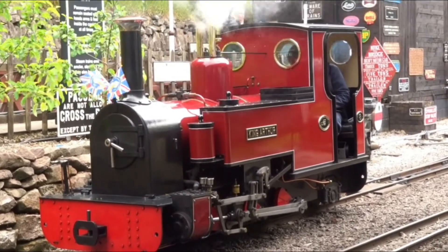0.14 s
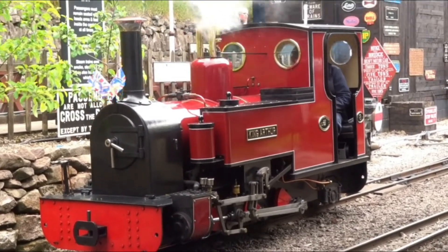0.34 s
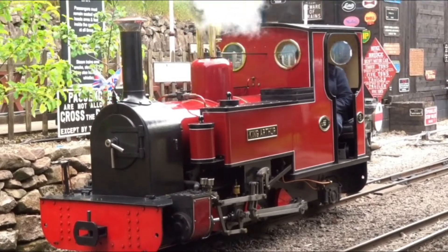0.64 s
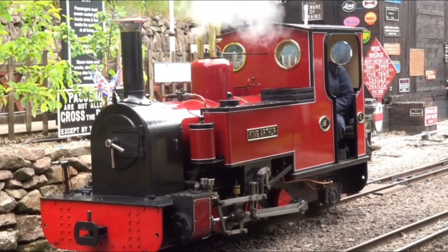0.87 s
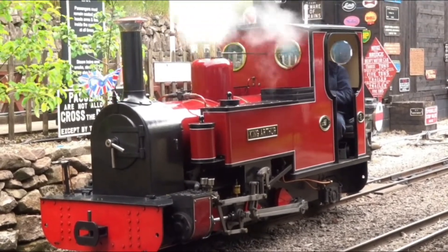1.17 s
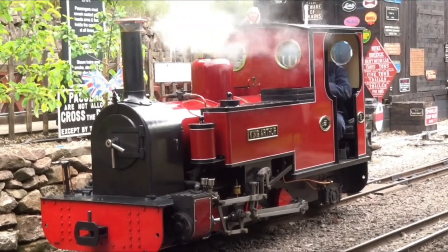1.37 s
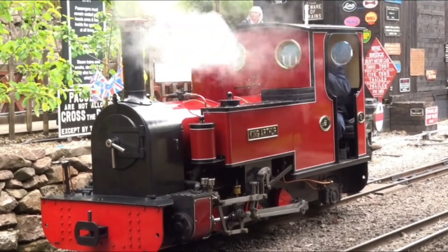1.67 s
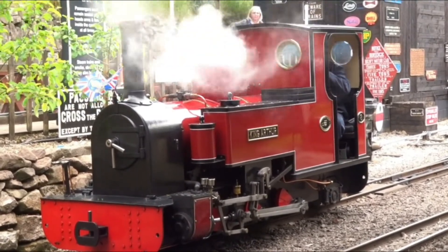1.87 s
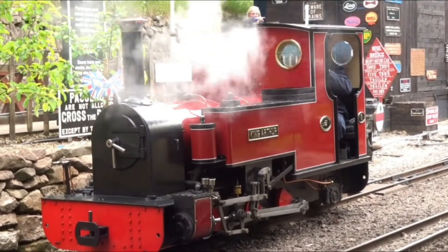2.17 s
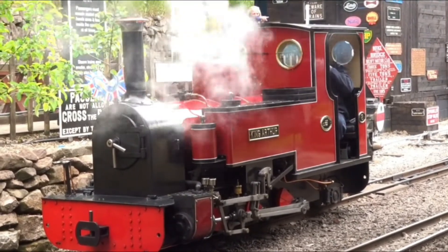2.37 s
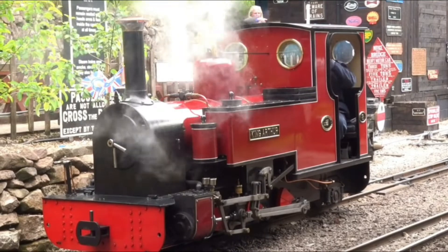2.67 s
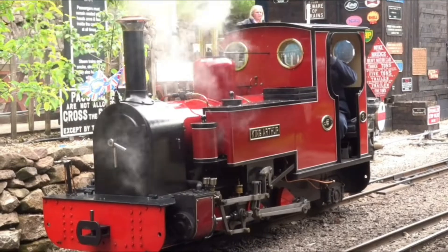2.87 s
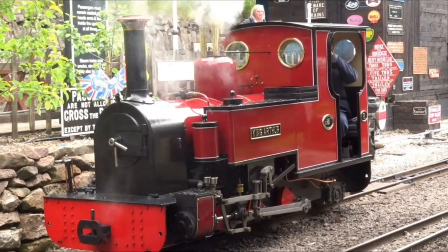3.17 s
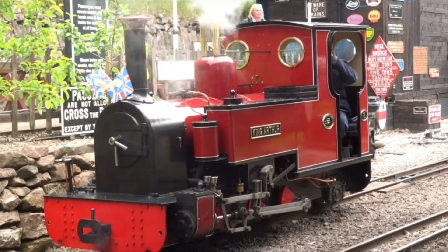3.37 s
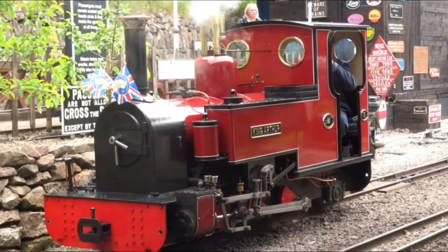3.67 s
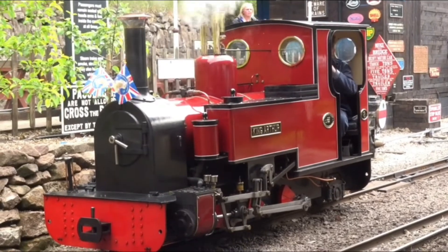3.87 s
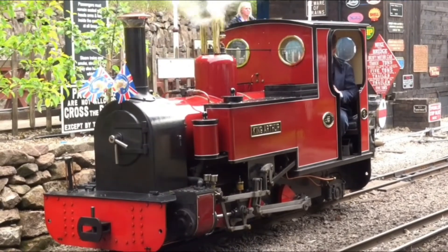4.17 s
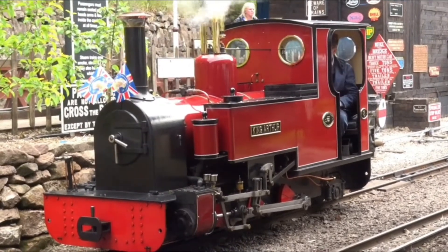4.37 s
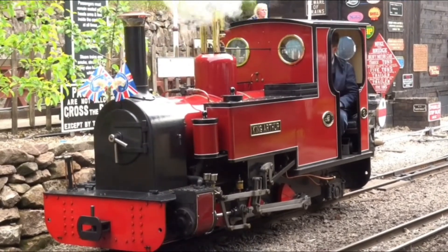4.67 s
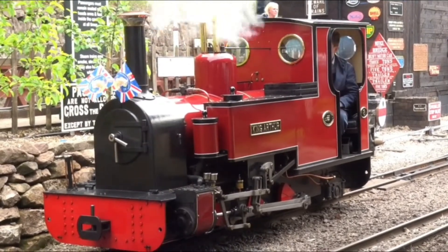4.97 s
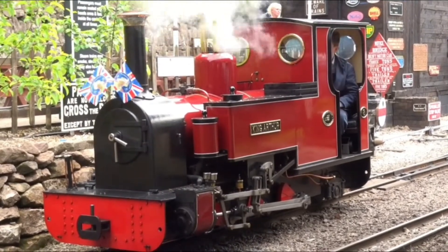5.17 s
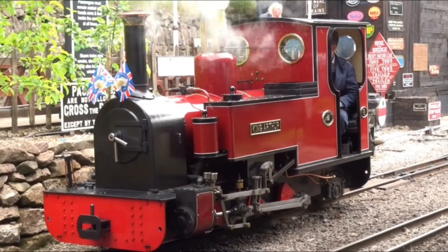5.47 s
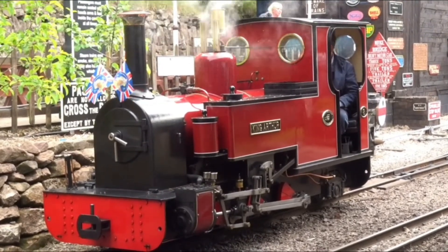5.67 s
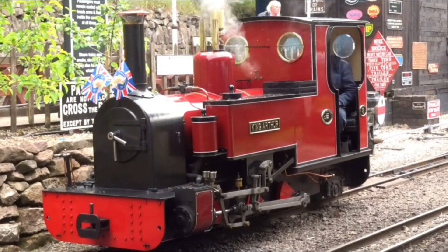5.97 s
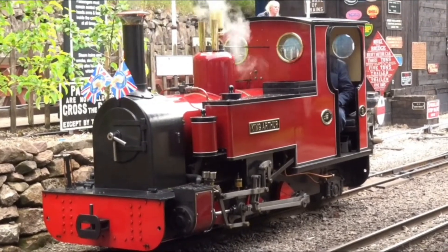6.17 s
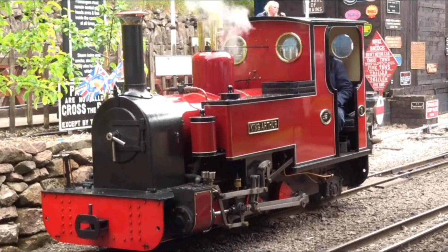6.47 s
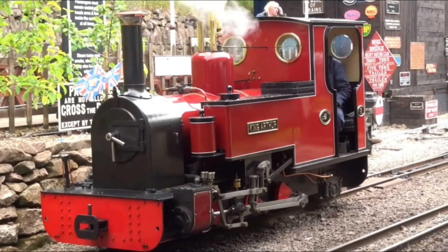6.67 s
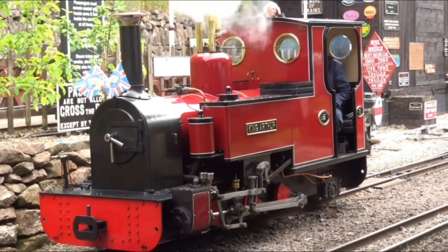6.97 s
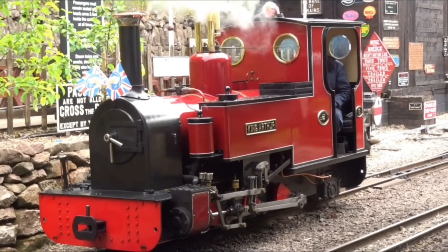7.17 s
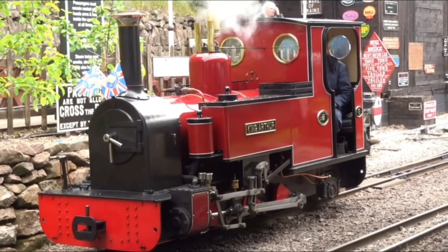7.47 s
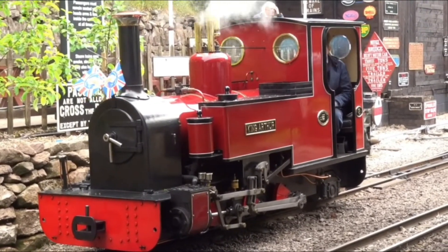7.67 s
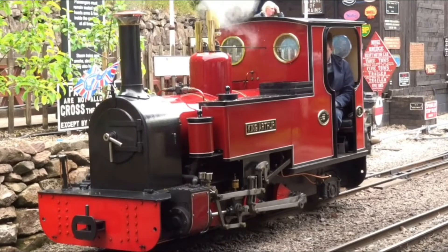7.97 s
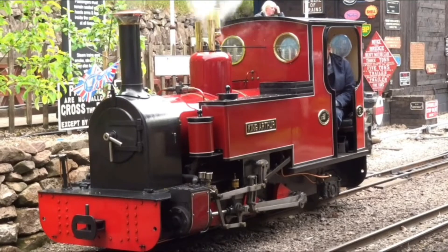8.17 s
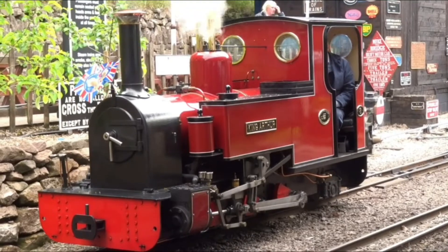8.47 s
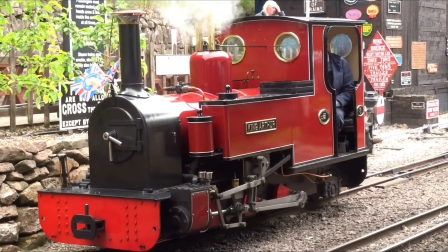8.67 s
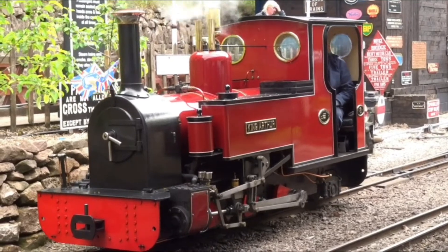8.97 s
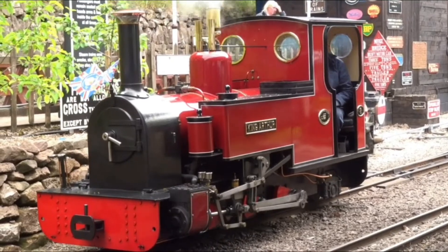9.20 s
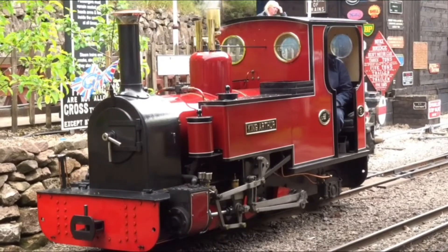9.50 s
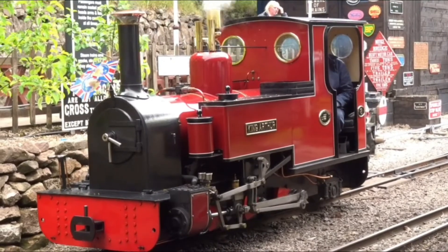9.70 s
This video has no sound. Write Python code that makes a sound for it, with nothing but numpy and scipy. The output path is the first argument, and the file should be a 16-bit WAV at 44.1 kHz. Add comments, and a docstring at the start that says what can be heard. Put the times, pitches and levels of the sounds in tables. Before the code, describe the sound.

From the start a standing steam engine's safety valve releases a loud, dense, bright hiss, with little bass and a wide treble, coloured by hollow, singing resonances around the middle and upper range. Between about 0.5 and 1.3 seconds thin, wavering squeals catch and break off inside it. The jet eases slightly, then holds with small flutters and brief whistly flare-ups near 2.5, 3 and 3.7 seconds. A dull fire roar and soft low puffs lie almost buried underneath. At about 5.1 seconds a wet, gurgling steam rush builds, brightens, and becomes a short hoarse whistle toot from roughly 5.3 to 5.6, scooping up in pitch, with a short outdoor station echo. The automatic level then leaves the hiss clearly quieter; held briefly, it slowly swells back until the end near 10 seconds, with small shifts and a quick singing flare around 8.3.

```python
"""Steam locomotive with safety valve and whistle

A small engine stands at a station: shaped noise is the valve's jet, with singing cavities and squeals. Under it
lie a gusty low roar at the bottom edge of the hiss and faint low swells of narrow noise. One tug on the chime
whistle lets wet steam rush, then swept sines sound the bells. A gain control ducks under the toot, so the hiss
drops and slowly swells back."""
import sys
import numpy as np
from scipy import signal
from scipy.fft import rfft, irfft, next_fast_len
from scipy.io import wavfile
from scipy.ndimage import uniform_filter1d, minimum_filter1d, map_coordinates

SR = 44100
rng = np.random.default_rng(int(sys.argv[2]) if len(sys.argv) > 2 else 0)


def digitize_waveform(pressure):
    """Quantize a signal to 16-bit integers and store it at the path in sys.argv[1].

    Rows of a 2-D input are taken as channels; values are limited to [-1, 1].
    """
    field = np.atleast_2d(pressure).T
    bounded = np.clip(field, -1, 1)
    quanta = np.round(bounded * 32767).astype(np.int16)
    wavfile.write(sys.argv[1], SR, quanta)


N = 433944
TIME = np.arange(N) / SR
SIZE = next_fast_len(N + SR)
FREQS = np.maximum(np.fft.rfftfreq(SIZE, 1 / SR), 1)

# Jet's broad colour: (frequency [Hz], relative density [dB per Hz])
JET_COLOUR = [(380, -6), (820, -9), (1000, -5), (2000, -2.5), (2800, 0.5), (4000, -6), (5300, -3),
              (7500, -3), (10900, -3.5)]
# Resonances of valve bonnet and cab front: (frequency [Hz], width [Hz], gain [dB])
BONNET_RESONANCES = [(680, 193, 4), (870, 54, -0.5), (935, 69, 3.5), (1034, 79, 14), (1058, 27.6, -18),
                     (1103, 41, 7.5), (1228, 61, 5), (1440, 150, 3.5), (1611, 27, 10), (1702, 143, 7),
                     (1754, 29, 5.5), (1988, 16, 4), (2143, 130, 3.5), (2190, 140, 1.5), (2355, 270, 3.5),
                     (2512, 8, 4), (2615, 45, 7), (2730, 170, 3.5), (2980, 64, 5.5), (3172, 160, 7),
                     (3400, 64, 3), (3520, 70, 8), (3670, 29, 8.5), (3804, 230, 10.5), (3900, 35, 0),
                     (4130, 160, 8), (4330, 45, 9), (4730, 70, 3.5), (4870, 170, 7.5), (5120, 100, 4.5),
                     (5710, 210, 6), (6540, 200, 6), (7200, 120, 1), (7950, 290, 4), (9450, 200, 3.5),
                     (10520, 580, 3)]
# Notches where the ground bounce cancels the jet: (frequency [Hz], width [Hz], gain [dB])
GROUND_NOTCHES = [(5400, 100, -4), (7650, 230, -4.5), (9030, 200, -2.5)]
# Cavity notes the jet makes sing: (frequency [Hz], width [Hz], rms re jet before drive [dB])
CAVITY_NOTES = [(2405, 35, -20), (2468, 16, -17.5), (4160, 85, -18), (1083, 14, -22)]
# Cavity notes flaring up: (centre [s], Gaussian width [s], note [Hz], extra drive [dB])
CAVITY_FLARES = [(2.543, 0.094, 4160, 5), (2.976, 0.03, 4160, 10.5), (3.672, 0.036, 1083, 9.5),
                 (8.08, 0.05, 2468, 2), (8.3, 0.034, 1083, 15), (8.317, 0.037, 4160, 10)]
# Valve lifting further or sinking: (start [s], end [s], jet change [dB], sizzle change [dB])
VALVE_SHIFTS = [(0.0, 0.207, 1, 2), (0.68, 1.092, 1, 2.5), (1.1, 2.018, -1.04, -1.3), (2.3, 3.0, 0, -0.4),
                (3.01, 3.055, -1.5, -3), (4.803, 5.45, 0.0, 2), (5.75, 6.6, 0.26, 0),
                (7.123, 7.426, 0, -0.4), (7.48, 7.98, -1.16, 0.5), (8.15, 8.41, 0.55, 1),
                (8.616, 9.22, 0.54, 0), (9.275, 9.58, -1.0, 0.5)]
# Valve's left-right lean: (frequency [Hz], left minus right [dB])
VALVE_LEAN = [(400, 0.1), (1200, -1), (1880, -0.5), (2250, -2), (2700, -0.3), (3700, -1), (4600, 1),
              (5500, 0), (6200, 1), (7200, -0.5), (7850, -4.5), (8600, -1.5), (9800, -1), (10800, 0.5)]
# Echoes off boiler, ground, walls: (delay [ms], level before wall gain [dB], extra right delay [ms])
SURFACE_ECHOES = [(5.5, -23, .08), (6.26, -26, -.02), (6.4, -22, 0), (6.48, -26, .08), (7.12, -25, .02),
                  (11.1, -23, .1), (11.74, -25, -.16), (14.84, -26, .06), (15.66, -24, .04),
                  (20.18, -27, -.02), (22.0, -25, .06), (28.76, -25, .02)]
# Edge tones while the valve rides on its seat:
# (start [s], end [s], frequency [Hz], peak before flutter and pan [dB])
SEAT_SQUEALS = [(0.46, 0.567, 2415, -26), (0.584, 0.84, 2405, -22), (0.688, 0.74, 2450, -20),
                (0.75, 0.82, 2466, -21.5), (0.836, 0.9, 2460, -23), (0.86, 0.99, 2440, -28),
                (0.964, 1.09, 2444, -23.5), (1.163, 1.23, 2420, -25), (1.23, 1.32, 2420, -30)]
# Steam at the whistle mouth: (frequency [Hz], relative density [dB per Hz])
RUSH_COLOUR = [(300, -10), (500, -9), (700, -5), (930, 1), (1250, -2.5), (1700, -7.5), (2330, 0),
               (3100, -5.5), (3900, -3.5), (5400, -5), (7000, -8), (8100, -5.5), (9100, -5.5), (10500, -9)]
# Chime notes, overblown upper ones first to speak:
# (frequency [Hz], level re chime [dB], roughness [0-1], start [s], end [s], ring [s])
BELL_NOTES = [(480, -11.5, .55, 5.37, 5.565, .025), (614, -12.5, .7, 5.395, 5.53, .02),
              (792, 0, .22, 5.38, 5.56, .016), (965, -20, .7, 5.29, 5.38, .03),
              (1280, -19, .5, 5.28, 5.43, .05), (1586, -19, .45, 5.33, 5.53, .03)]
# Faint low swells of narrow noise, strongest during the whistle: (start [s], end [s], centre [Hz], level [dB])
LOW_SWELLS = [(1.066, 1.23, 287, -56), (1.995, 2.1, 290, -53.5), (3.25, 3.335, 285, -59),
              (5.058, 5.2, 310, -42), (5.16, 5.29, 330, -36), (5.477, 5.547, 312, -36.5),
              (8.14, 8.206, 295, -56), (8.568, 8.70, 182, -50), (8.715, 8.785, 174, -48),
              (9.725, 9.796, 257, -46)]
# Steam noise's stereo likeness: (frequency [Hz], left-right likeness [0-1])
STEREO_LIKENESS = [(400, 0.87), (1000, 0.89), (2000, 0.72), (4000, 0.63), (8000, 0.2), (11000, 0.14)]

ROAR_GROWTH_DB_PER_S = 1.05  # the low roar grows steadily louder
VALVE_DB, SHIFT_S = -20, 0.023
SIZZLE_START_DB, SIZZLE_FADE_DB_PER_S = 2, 0.17  # fades as boiler pressure falls
UPPER_FROM_S, UPPER_BEFORE_DB, UPPER_AFTER_DB = 1.63, -1.5, 4.5  # upper cavity's drive steps up
LOWER_DRIVE_DB, DEEP_DRIVE_DB = 1.5, -2
DRIVE_DB_PER_JET_DB = 1.8  # lower pair only
FLARE_REACH_HZ = 150  # notes this close flare together
PULL_S, CHIME_HISS_S, LET_GO_S = 5.062, 5.1, 5.56
RUSH_DB, RUSH_ATTACK_S, RUSH_RELEASE_S = -11, 0.11, 0.048
CHIME_HISS_DB, CHIME_HISS_ATTACK_S, CHIME_HISS_RELEASE_S = 1.5, 0.071, 0.025  # extra rush
CHIME_DB, BELL_ATTACK_S = -8.5, 0.05
YARD_T60_S, YARD_DB, YARD_THIN_HZ = 0.56, -13, 477  # little returns below this pitch
LOW_CUT_HZ, TOP_CUT_HZ = 381, 11010
GAIN_KNEE_DB, GAIN_SLOPE, GAIN_HOLD_S, GAIN_RECOVERY_S = -15, 0.96, 0.57, 2.09


def from_db(db):
    """Decibels to amplitude gain."""
    return 10 ** (np.asarray(db) / 20)


def rms_one(x):
    """Scale to unit rms."""
    return x / np.sqrt(np.mean(x ** 2) + 1e-20)


def over_hz(points):
    """Table joined by straight lines over log frequency."""
    hz, value = np.transpose(points)
    return np.interp(np.log(FREQS), np.log(hz), value)


def resonances_db(rows):
    """Summed bell-shaped peaks and dips over frequency."""
    return sum(db / (1 + (2 * (FREQS - hz) / width_hz) ** 2) for hz, width_hz, db in rows)


def filtered(x, response):
    """Pass a sound through a frequency response."""
    return irfft(rfft(x, SIZE) * response, SIZE)[..., :N]


def drift(corner_hz):
    """Smooth random wander, rms 1: two-pole lowpassed noise on every 40th sample."""
    step = 40
    pole = np.exp(-2 * np.pi * corner_hz * step / SR)
    white = rng.standard_normal(N // step + 2002)
    slow = signal.lfilter([1], [1, -2 * pole, pole * pole], white)[2000:]  # drop the run-in
    return np.interp(np.arange(N) / step, np.arange(len(slow)), rms_one(slow))


def envelope(start_s, end_s, attack_s, release_s):
    """Rise exponentially towards 1 from the start; die away after the end."""
    rise = 1 - np.exp(-np.maximum(TIME - start_s, 0) / attack_s)
    return rise * np.exp(-np.maximum(TIME - end_s, 0) / release_s)


def swell(start_s, end_s):
    """One half-sine hump."""
    return np.sin(np.pi * np.clip((TIME - start_s) / (end_s - start_s), 0, 1))


def steam_noise(response):
    """Stereo turbulence of a given colour, wider towards the treble; rms 1."""
    alike = np.clip(over_hz(STEREO_LIKENESS), 0, .99)
    mid = filtered(rng.standard_normal(N), response * np.sqrt(1 + alike))
    side = filtered(rng.standard_normal(N), response * np.sqrt(1 - alike))
    return rms_one(np.array([mid + side, mid - side]))


def low_roar(roar_start_db=-60.0, roar_hz=330, width_hz=32, gust_corner_hz=12):
    """Dull low roar at the bottom edge of the hiss: narrow noise in short random gusts."""
    roar = steam_noise(1 / (1 + ((FREQS - roar_hz) / width_hz) ** 8))
    gusts = np.tanh(np.maximum(drift(gust_corner_hz), 0) ** 2)
    return roar * gusts * from_db(roar_start_db + ROAR_GROWTH_DB_PER_S * TIME)


def low_swells(half_width_hz=26, order=4):
    """Short swells of dull, narrow noise, the same at both ears."""
    out, white = 0, rng.standard_normal(N)
    for start_s, end_s, hz, db in LOW_SWELLS:
        edges_hz = [hz - half_width_hz, hz + half_width_hz]
        band = signal.butter(order, edges_hz, "band", fs=SR, output="sos")
        puff = rms_one(signal.sosfilt(band, white))
        out = out + from_db(db) * swell(start_s, end_s) ** 2 * puff
    return out


def near_echoes(wall_db=2.0, wall_hz=3000, scatter_db=-10, scatter_hz=4200, fade_ms=12, count=30):
    """Large surfaces return the low hiss; small fittings scatter the treble, differently to each ear."""
    walls, fittings = np.zeros((2, 2, len(FREQS)), complex)
    for ms, db, late_ms in SURFACE_ECHOES:
        delay_s = np.array([[ms], [ms + late_ms]]) / 1000
        walls += from_db(wall_db + db) * np.exp(-2j * np.pi * FREQS * delay_s)
    for ear in range(2):
        delays_ms = rng.uniform(2, 40, count)
        at = (delays_ms * SR / 1000).astype(int)
        taps = np.zeros(SIZE)
        taps[at] = rng.choice([-1, 1], count) * np.exp(-delays_ms / fade_ms)
        fittings[ear] = from_db(scatter_db) * rfft(taps) / np.linalg.norm(taps)
    treble_power = 1 / (1 + (scatter_hz / FREQS) ** 6)
    dulled_walls = walls / np.sqrt(1 + (FREQS / wall_hz) ** 2)
    out = 1 + dulled_walls + np.sqrt(treble_power) * fittings
    return out / np.sqrt(np.mean(abs(out) ** 2))


def through_plume(x, paths_ms=(1.3, 2.9, 4.6), echo_db=-15, sway_ms=0.029, sway_corner_hz=0.61):
    """Glancing paths cross the swaying cloud; wandering delays keep shifting the treble colour."""
    out, at = x, np.arange(N)
    for ms in paths_ms:
        delay = (ms + sway_ms * drift(sway_corner_hz)) * SR / 1000  # samples
        echo = np.array([map_coordinates(side, [at - delay], order=3) for side in x])
        out = out + from_db(echo_db) * echo
    return out


def valve_flow():
    """Jet and sizzle levels in dB, as the valve shifts on its spring."""
    jet_db, sizzle_db = 0, SIZZLE_START_DB - SIZZLE_FADE_DB_PER_S * TIME
    for start_s, end_s, more_jet_db, more_sizzle_db in VALVE_SHIFTS:
        shifted = envelope(start_s, end_s, SHIFT_S, SHIFT_S)
        jet_db = jet_db + more_jet_db * shifted
        sizzle_db = sizzle_db + more_sizzle_db * shifted
    return jet_db, sizzle_db


def cavity_drives(jet_db, fitful_db=0.5, fit_corner_hz=6):
    """Drive of each cavity note in dB: all by fits, the lower pair also with the jet."""
    lower_db = LOWER_DRIVE_DB + DRIVE_DB_PER_JET_DB * jet_db + fitful_db * drift(fit_corner_hz)
    upper_step_db = np.where(TIME < UPPER_FROM_S, UPPER_BEFORE_DB, UPPER_AFTER_DB)
    upper_db = upper_step_db + fitful_db * drift(fit_corner_hz)
    deep_db = DEEP_DRIVE_DB + fitful_db * drift(fit_corner_hz)
    return lower_db, lower_db, upper_db, deep_db


def flare_db(hz):
    """Extra drive of one cavity note from its Gaussian flare-ups."""
    return sum(db * np.exp(-((TIME - centre_s) / width_s) ** 2)
               for centre_s, width_s, note_hz, db in CAVITY_FLARES if abs(note_hz - hz) < FLARE_REACH_HZ)


def safety_valve(flutter_db=0.76, sizzle_flutter_db=0.5, sizzle_hz=6000):
    """Turbulent jet coloured by the bonnet; cavities sing by fits, the finest eddies sizzle."""
    jet_db, sizzle_db = valve_flow()
    colour_db = over_hz(JET_COLOUR) + resonances_db(BONNET_RESONANCES) + resonances_db(GROUND_NOTCHES)
    jet = steam_noise(from_db(colour_db))
    sizzle = filtered(jet, 1 / (1 + (sizzle_hz / FREQS) ** 6))
    sizzle_gain = from_db(sizzle_db + sizzle_flutter_db * drift(23))
    out = jet - sizzle + through_plume(sizzle) * sizzle_gain
    for (hz, width_hz, db), drive_db in zip(CAVITY_NOTES, cavity_drives(jet_db)):
        note = steam_noise(1 / (1 + ((FREQS - hz) / width_hz) ** 2))
        out += note * from_db(db + drive_db + flare_db(hz))
    level_db = VALVE_DB + jet_db + flutter_db * drift(21.6)
    lean = from_db(over_hz(VALVE_LEAN) * [[.5], [-.5]])
    return filtered(out * from_db(level_db), near_echoes() * lean)


def squeal(waver=0.0018, flutter_db=1.5):
    """Wavering edge tones catch and break off at close pitches, at times overlapping."""
    out = 0
    for start_s, end_s, hz, db in SEAT_SQUEALS:
        phase = 2 * np.pi * np.cumsum(hz * (1 + waver * drift(29))) / SR
        out = out + np.sin(phase) * swell(start_s, end_s) * from_db(db)
    return out * from_db(flutter_db * drift(31))


def yard(x):
    """Reverberation between station walls: eight dying echo trains a side."""
    out = np.zeros((2, len(FREQS)), complex)
    for k, delay_s in enumerate(rng.uniform(.025, .085, 16)):
        loop = from_db(-60 * delay_s / YARD_T60_S) * np.exp(-2j * np.pi * FREQS * delay_s)
        out[k % 2] += (-1) ** (k // 2) * loop / (1 - loop)
    level = out / np.sqrt(np.mean(abs(out) ** 2))
    return filtered(x, level / (1 + (YARD_THIN_HZ / FREQS) ** 4))


def far_wall(x, delay_s=0.12, db=-17.0, dull_hz=1500):
    """One dull slap from the station building."""
    slap = from_db(db) * np.exp(-2j * np.pi * FREQS * delay_s)
    return filtered(x, slap / (1 + (FREQS / dull_hz) ** 2))


def bells(pitch_waver=0.0294, flutter_db=5, scoop=.17, settle_s=0.0188):
    """Notes catch flat, scoop up and die at their own pace; water shakes pitch and level."""
    out = 0
    for hz, db, rough, start_s, end_s, ring_s in BELL_NOTES:
        pitch_hz = hz * (1 - scoop * np.exp(-np.maximum(TIME - start_s, 0) / settle_s))
        phase = 2 * np.pi * np.cumsum(pitch_hz * (1 + rough * pitch_waver * drift(61))) / SR
        level = from_db(db + rough * flutter_db * drift(60))
        shape = envelope(start_s, end_s, BELL_ATTACK_S, ring_s)
        out = out + np.sqrt(2) * np.sin(phase) * shape * level
    return out


def whistle(splutter_db=0.2, gurgle_db=2.5, gurgle_hz=1300, dry_hz=8000, dry_db=4, dry_s=5.24,
            dry_rise_s=0.046):
    """Wet steam gurgles through the mouth, hisses brighter as it dries, then sounds the bells."""
    flow = envelope(PULL_S, LET_GO_S, RUSH_ATTACK_S, RUSH_RELEASE_S)
    chime_hiss = envelope(CHIME_HISS_S, LET_GO_S, CHIME_HISS_ATTACK_S, CHIME_HISS_RELEASE_S)
    steam = steam_noise(from_db(over_hz(RUSH_COLOUR) + resonances_db(GROUND_NOTCHES)))
    body = filtered(steam, 1 / (1 + (FREQS / gurgle_hz) ** 4))
    top = filtered(steam, 1 / (1 + (dry_hz / FREQS) ** 12))
    dryness = np.tanh((TIME - dry_s) / dry_rise_s)  # -1 wet, +1 dry
    gurgle = body * from_db(gurgle_db * drift(30))
    rush = steam - body - top + gurgle + top * from_db(dry_db * dryness)
    rush_db = RUSH_DB + CHIME_HISS_DB * chime_hiss + splutter_db * drift(39)
    direct = rush * flow * from_db(rush_db) + bells() * from_db(CHIME_DB)
    return direct + from_db(YARD_DB) * yard(direct) + far_wall(direct)


def scene():
    """Low roar and low swells under bass-cut valve, squeals and whistle; the last two a touch to the right."""
    background = low_roar() + low_swells()
    steam = safety_valve() + (squeal() + whistle()) * from_db([[-.45], [.45]])
    low_cut = signal.butter(18, LOW_CUT_HZ, "high", fs=SR, output="sos")
    return background + signal.sosfilt(low_cut, steam)


def gain_control(x, window_s=0.0084):
    """Loud sound pulls the gain down at once; it is held, then creeps back ever more slowly."""
    power = uniform_filter1d(np.mean(x ** 2, axis=0), int(window_s * SR))
    level_db = 10 * np.log10(np.maximum(power, 1e-12))
    cut_db = GAIN_SLOPE * np.maximum(level_db - GAIN_KNEE_DB, 0)
    half = int(GAIN_HOLD_S * SR / 2)
    # largest cut over the past hold time
    held_db = -minimum_filter1d(-cut_db, 2 * half + 1, origin=half, mode="nearest")
    recovery = np.exp(-TIME / GAIN_RECOVERY_S)
    recovering_db = np.maximum.accumulate(held_db / recovery) * recovery
    return x * from_db(-recovering_db)


def record(dry):
    """Gain control, then a steep top cut."""
    return filtered(gain_control(dry), 1 / np.sqrt(1 + (FREQS / TOP_CUT_HZ) ** 900))


dry = scene()
out = record(dry)
digitize_waveform(out)
```